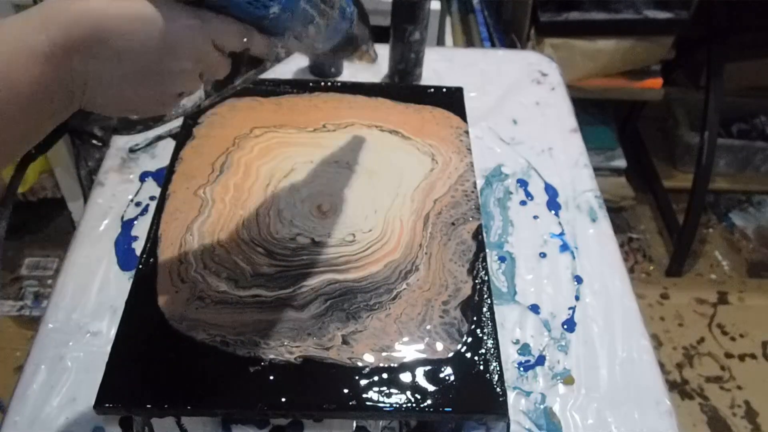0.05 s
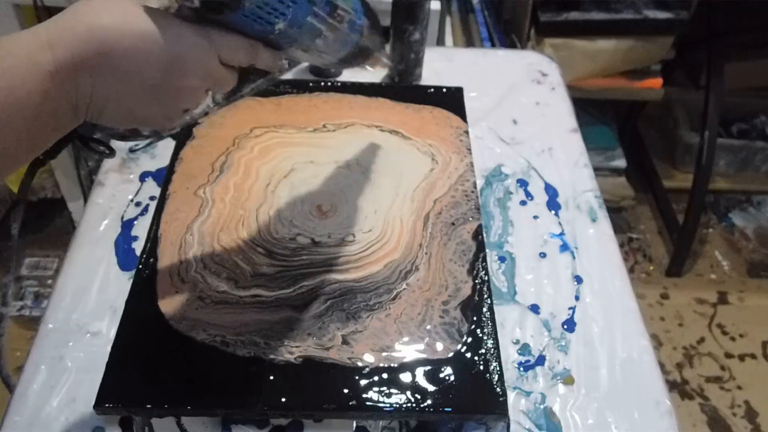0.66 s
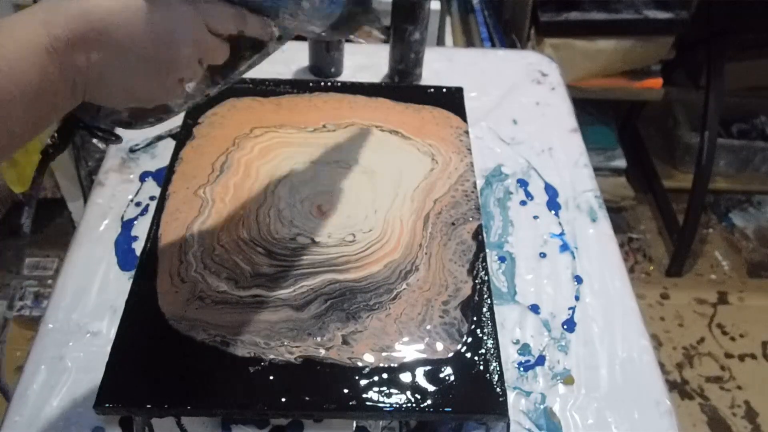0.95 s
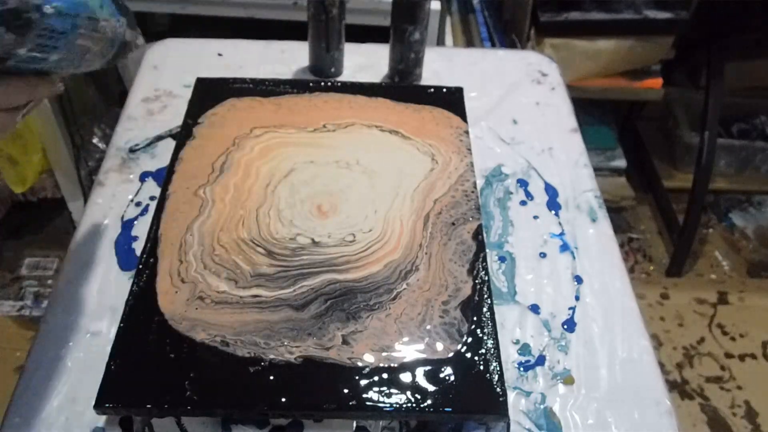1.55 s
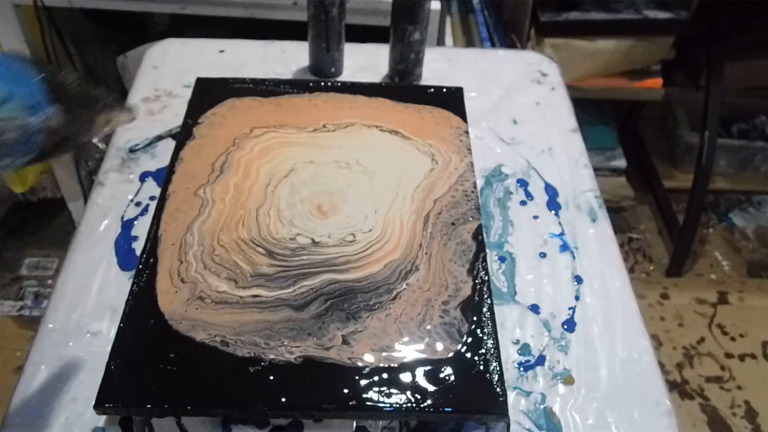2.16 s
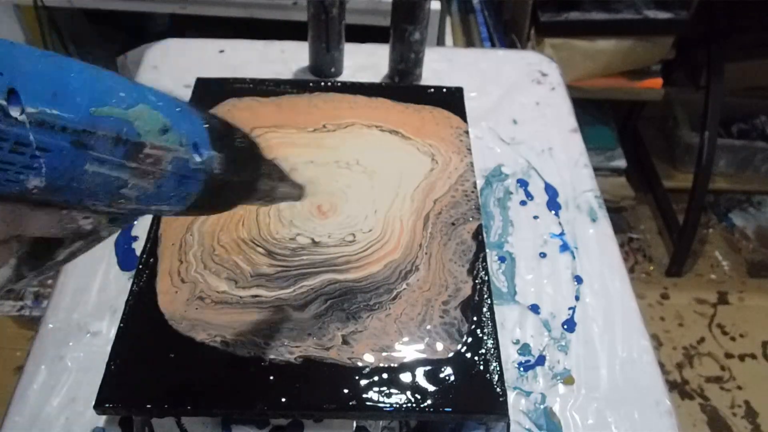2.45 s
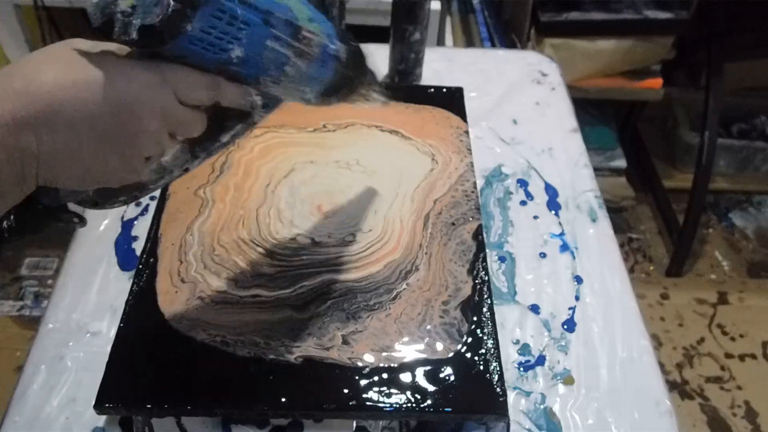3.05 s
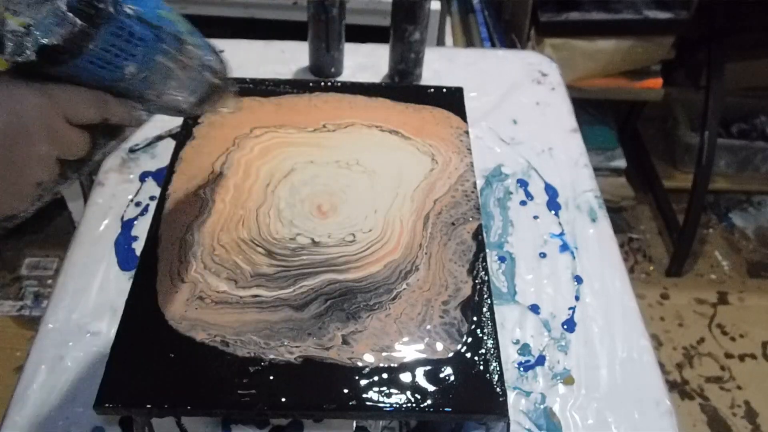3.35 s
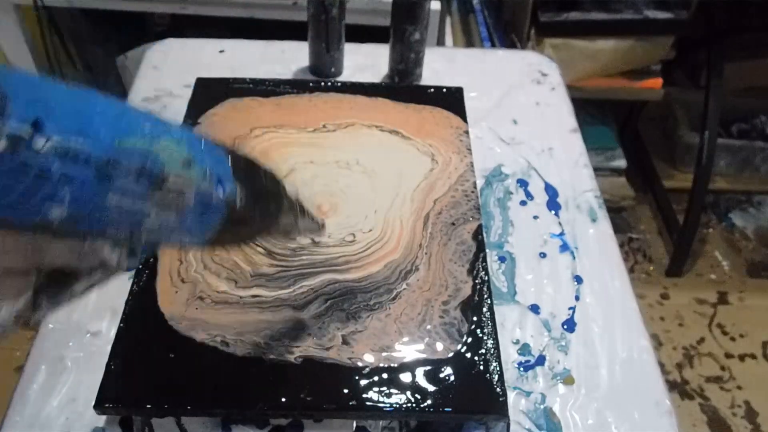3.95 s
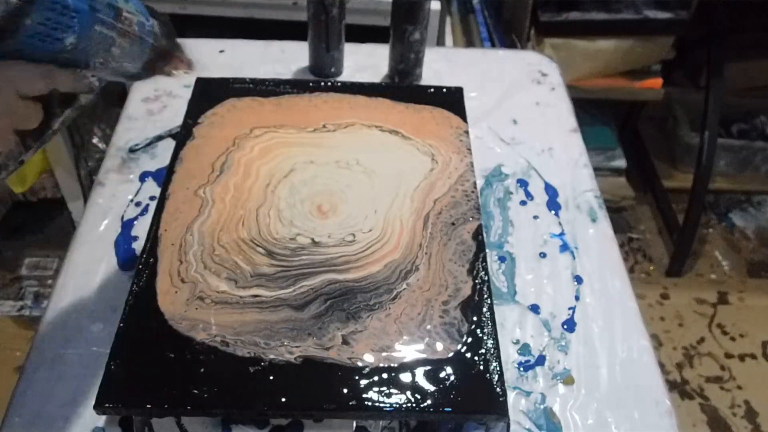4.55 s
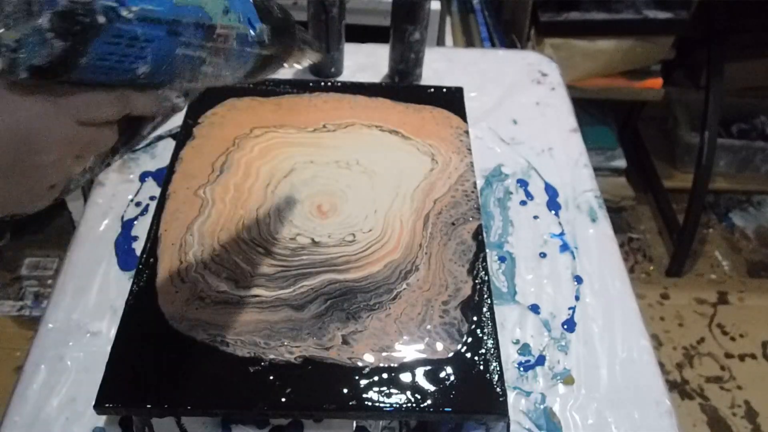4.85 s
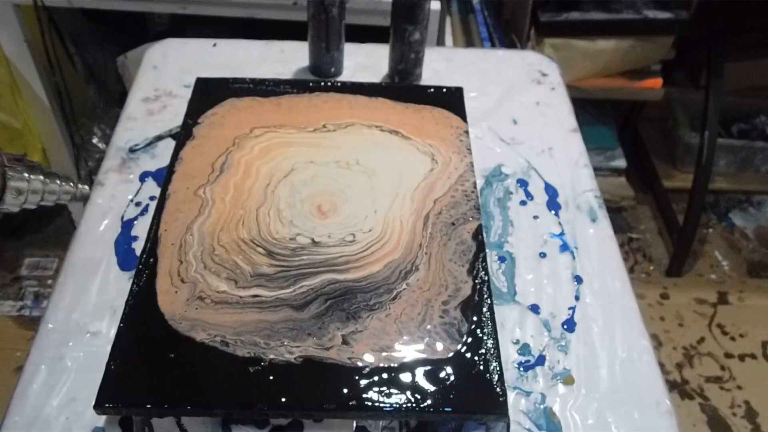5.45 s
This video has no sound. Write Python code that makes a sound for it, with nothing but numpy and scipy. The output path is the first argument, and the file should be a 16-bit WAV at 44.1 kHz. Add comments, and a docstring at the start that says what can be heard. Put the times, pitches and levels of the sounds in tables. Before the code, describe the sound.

Steady rush of air and a high motor whine from a heat gun moving to and fro over a wet painting indoors.

```python
"""A handheld electric heat gun runs steadily, swept to and fro over a wet painting in a small workroom.
Churning air from its fan roars through the hollows of the housing and barrel, and the little motor
whines at multiples of its turning rate. As the gun swings left it sounds farther away and changes
colour. Twice the jet hisses close over the canvas. Behind it all, the room hums faintly."""
import sys
import numpy as np
from scipy import signal
from scipy.fft import rfft, irfft
from scipy.io import wavfile
from scipy.ndimage import map_coordinates

SR = 44100
rng = np.random.default_rng(int(sys.argv[2]) if len(sys.argv) > 2 else 0)


def master_out(mix):
    """Clip the mix to full scale and print it as 16-bit PCM to the path in sys.argv[1]."""
    frames = np.transpose(np.atleast_2d(mix))
    ceiling = np.clip(frames, -1, 1)
    pcm = np.round(ceiling * 32767).astype(np.int16)
    wavfile.write(sys.argv[1], SR, pcm)


N = 247842
TIME, FREQS = np.arange(N) / SR, np.maximum(np.arange(N // 2 + 1) * SR / N, 1)
SIDES = np.array([[1], [-1]])   # left, right

# Where the gun is. Each row: time in seconds, bearing (0 is straight ahead, 1 is fully left).
GUN_BEARING = [(0, 0), (1.05, .06), (1.35, .24), (1.65, .54), (1.85, .82), (2.08, .88), (2.4, .6),
               (2.55, .54), (3.05, .1), (3.35, .39), (3.6, .2), (3.9, .47), (4.25, .81), (4.85, .28),
               (5.15, .68), (5.4, .94), (5.62, .94)]
# The tone colour of the churning air. Each row: frequency in Hz, relative level in dB.
AIR_SPECTRUM = [(25, -39.5), (50, -41), (150, -38.5), (220, -32), (290, -27), (470, -21), (590, -12.5),
                (1000, -1), (1800, -0.5), (2850, -7.5), (3120, -14.5), (4000, -15), (4600, -17.5),
                (8500, -19), (15500, -31)]
# Resonances and hollows of housing and barrel. Each row: centre in Hz, width in Hz, boost or cut in dB.
HOUSING_RESONANCES = [(432, 117, 4), (526, 38, 4.5), (614.6, 102, 9.5), (741, 73, 5.5), (957, 124, 2.5),
                      (1210, 140, 1), (1270, 100, 2), (1405, 41, -13), (1420, 75, 3.5), (1850, 133, 4),
                      (2160, 180, -1), (2400, 190, 1.5), (2618, 250, 3), (2924, 164, 4.5), (3410, 330, 5),
                      (3967, 350, 6.5), (5530, 370, -3), (6650, 2500, 1), (11100, 560, -2.5)]
# How each band of the roar is beamed. Each row: lower edge in Hz, change from ahead to fully left
# in dB, extra when straight ahead in dB.
AIR_BEAMS = [(0, -1.5, -3), (510, 2.5, 3.5), (780, 8, 4.5), (1140, -2.5, -2.5), (1660, 0, 2.5),
             (2030, -2, -3), (3000, -8.5, -4), (4200, -0.5, 0.5), (7540, 8.5, 4), (10800, 1, 1)]
# The upper-middle rush, dullest as the gun is drawn back. Each row: time in seconds, relative dB.
RUSH_LEVEL = [(0, 1.5), (.5, 2), (1.15, 3), (1.45, -1.5), (1.92, -4.5), (2.35, -0.5), (3.0, 1), (3.8, -0.5),
              (4.45, -3), (4.85, 1.5), (5.2, -1), (5.62, -1.5)]
# The treble, strongest while the jet plays on the canvas. Each row: time in seconds, relative dB.
TREBLE_LEVEL = [(0, 1), (1.3, 2.5), (1.6, 1.3), (2.1, 1.8), (2.4, 4), (3.0, 2.5), (4.0, 3.3), (4.95, 2.5),
                (5.62, 2)]
# The band that the bounce off the table cancels as the gun is raised and lowered.
# Each row: time in seconds, centre in Hz, depth from 0 to 1.
TABLE_NOTCH = [(0, 846, 0.6), (1.25, 890, 0.44), (1.75, 710, 0.63), (2.25, 690, 0.47), (2.5, 680, 0.24),
               (2.95, 750, 0.28), (3.5, 750, 0.36), (4.05, 686, 0.05), (4.42, 720, 0.57), (5.1, 610, 0.17),
               (5.62, 517, 0.7)]
# Brief swells and dips in the roar. Each row: peak time in seconds, spread in seconds, centre in Hz,
# width in Hz, boost or cut in dB.
PASSING_COLOURS = [(.45, 0.12, 730, 120, 2.5), (.48, 0.079, 2280, 250, 5), (2.04, 0.072, 2000, 150, -9),
                   (2.38, 0.13, 1460, 100, 5.5), (4.15, 0.091, 1990, 350, -5.5),
                   (4.45, 0.15, 2480, 300, -4), (5.33, 0.063, 1850, 200, -10), (5.435, 0.1, 960, 260, 2),
                   (5.47, .2, 1240, 160, -9)]
# Motor speed, creeping up and swaying with the sweeps. Each row: time in seconds, turns per second.
MOTOR_SPEED = [(0, 324.3), (.45, 324.35), (.9, 324.9), (1.5, 325.25), (1.8, 325.7), (2.15, 325.45),
               (2.35, 325.95), (2.65, 325.45), (3.1, 325.9), (3.4, 326.9), (3.55, 327.05), (3.77, 326.65),
               (4.05, 327.4), (4.55, 326.9), (4.85, 327.8), (5.25, 327), (5.62, 327.25)]
# The five-blade fan's tone, the whine of the commutator (the motor's turning contact) and its octave.
# Each row: time in seconds, level in dB, left minus right in dB.
FAN_TONE = [(0, -30.5, -4), (.9, -31.5, 1.5), (1.19, -37.5, -3), (1.33, -30.5, -1), (1.53, -37, 0),
            (1.6, -32, 4), (1.82, -34, 1), (1.9, -38, 0), (2.15, -39, 2), (2.4, -32, 0), (2.8, -31.5, 1),
            (2.88, -37, 3), (3.11, -31, 1), (3.38, -40, 1), (3.58, -34, 0), (3.87, -36, -2),
            (4.06, -33.5, 12), (4.16, -29, 9), (4.33, -36, 2), (4.62, -34.5, 0), (4.85, -32.5, 0),
            (5.27, -34, 2), (5.42, -27.5, 3), (5.62, -28, 3)]
COMMUTATOR_WHINE = [(0, -33, 2), (.35, -35.5, 5), (.68, -34, 0), (.86, -33.5, 1), (.92, -36, -2),
                    (1, -34.5, 0), (1.13, -36, 4), (1.38, -35, 3), (1.48, -29.5, 3), (1.56, -37, 1),
                    (1.66, -32, 0), (1.79, -44, 0), (1.89, -36, 10), (2.15, -35.5, 12), (2.22, -45, 2),
                    (2.36, -37.5, 7), (2.44, -40, 5), (2.53, -32.5, 10), (2.7, -41, 9), (2.77, -37, 13),
                    (2.85, -43, 1), (2.95, -36.5, 5), (3.15, -38, 3), (3.28, -35, 0), (3.42, -38.5, 4),
                    (3.72, -32.5, 9), (3.85, -39.5, 7), (3.99, -32, 7), (4.08, -45, 0), (4.25, -35, 7),
                    (4.5, -38.5, 1), (4.63, -39, 1), (4.72, -33, 1), (4.82, -49, 2), (4.92, -33.5, 9),
                    (5.04, -41, -2), (5.11, -39, 7), (5.26, -47, 5), (5.35, -34.5, 10), (5.5, -43, 0),
                    (5.62, -53, 0)]
WHINE_OCTAVE = [(0, -40.5, -1), (.32, -40.5, 0), (.4, -46, -4), (.6, -47, -4), (.78, -47, -1),
                (.97, -38.5, 3), (1.05, -46, 1), (1.11, -41.5, 0), (1.28, -46, 1), (1.37, -41, -7),
                (1.48, -46, 0), (1.6, -41, 0), (1.67, -48, -1), (1.76, -41.5, 8), (1.9, -46, 0),
                (2.3, -44, 4), (2.45, -48, 0), (2.8, -44, -2), (2.97, -40, 2), (3.04, -47, 0),
                (3.09, -41, -5), (3.19, -47, 0), (3.33, -41, 6), (3.52, -45, -3), (3.65, -41, 4),
                (3.85, -48, 0), (4.1, -44, -6), (4.3, -45.5, 0), (4.47, -43, 0), (4.55, -48, -1),
                (4.72, -41.5, 0), (4.86, -41, 0), (4.94, -49, 0), (5.02, -42, 4), (5.13, -50, 0),
                (5.3, -42.5, 0), (5.45, -50, 0), (5.62, -47, 0)]
# Two tones just under the whine. Each row: time in seconds, dB of the 10th multiple, dB of the 11th.
SIDE_TONE_LEVELS = [(0, -47, -55), (.42, -43.5, -44), (.9, -47.5, -38.5), (1.2, -56, -46), (1.55, -54, -44),
                    (1.75, -52, -47), (1.88, -38, -48), (2.05, -44, -53), (2.25, -47, -50),
                    (2.43, -40.5, -49), (2.6, -48, -49), (3.25, -46, -44), (3.8, -46.5, -44.5),
                    (4.4, -47, -48), (4.75, -47, -45), (5.15, -47, -49), (5.3, -41, -50), (5.62, -55, -54)]
# The weaker motor tones. Each row: multiple of the turning rate, relative level in dB.
WEAK_TONES = [(7, -44.5), (9, -51.5), (13, -51), (14, -54), (15, -50), (16, -58), (17, -54), (18, -54.5),
              (19, -53.5), (20, -56.5), (21, -50.5), (22, -50.5), (23, -50)]
# The buzz of the motor's brushes. Each row: frequency in Hz, relative level of one tone in dB.
BUZZ_SPECTRUM = [(8150, -54), (8800, -55), (9450, -54.5), (10100, -50), (10450, -55), (12050, -56),
                 (12380, -51.5), (12700, -56.5), (13100, -52.5), (13400, -56), (13700, -54), (14600, -56.5),
                 (15700, -64)]
# The buzz is weakest with the vents turned away. Each row: time in seconds, level change in dB.
BUZZ_LEVEL = [(0, 0), (.6, 0), (1.3, 0), (1.85, -2), (2.45, -1), (3, .5), (3.9, 0), (4.35, -0.5),
              (4.9, 1.5), (5.25, -0.5), (5.62, -5)]
# Hisses on the canvas; the first two sound as one. Each row: peak time in seconds, spread in seconds,
# centre in Hz, width in Hz, level in dB.
CANVAS_HISSES = [(3.565, .04, 4950, 1300, -37.5), (3.565, .035, 7600, 3800, -37),
                 (4.97, .045, 11500, 5000, -46)]
# The microphone's two openings (ports) hear unequally. Each row: frequency in Hz, left minus right in dB.
PORT_BALANCE = [(110, -0.5), (330, 2.7), (600, 0.5), (1300, 1.5), (1800, 0), (2300, -1.5), (3200, -0.5),
                (4000, 0.5), (6000, 0)]
# The room's hum; its top tone beats against the shaft hum. Each row: frequency in Hz, level in dB.
ROOM_TONES = [(46.9, -83), (93.8, -84), (140.7, -84), (187.6, -81), (329.5, -63.5)]


def fan_roar(bearing, level_db, flutter_db, treble_flutter_db, wander_db):
    """Churning air rings in the housing; each band is beamed its own way as the gun turns."""
    resonance_db = sum(db * bell(hz, width) for hz, width, db in HOUSING_RESONANCES)
    spectrum = noise_spectra() * from_db(at_hz(AIR_SPECTRUM, FREQS) + resonance_db)
    spectrum = spectrum / np.std(irfft(spectrum, N))
    above_edge = [1] + [1 - below(hz) for hz, _, _ in AIR_BEAMS[1:]] + [0]
    roar = 0
    for low, high, (_, left_db, ahead_db) in zip(above_edge, above_edge[1:], AIR_BEAMS):
        db = left_db * bearing + ahead_db * facing(bearing) + wander_db * drift(7)
        roar = roar + irfft(spectrum * (low - high), N) * from_db(db - db.mean())
    roar = swell_band(roar, in_time(RUSH_LEVEL)[0], low_hz=2210, high_hz=3070)
    treble_db = in_time(TREBLE_LEVEL)[0] + treble_flutter_db * drift(40)
    roar = swell_band(roar, treble_db, low_hz=4400, high_hz=SR)
    return from_db(level_db + flutter_db * drift(25.51)) * roar


def table_bounce(roar, width_hz):
    """The bounce off the table cancels one band, which slides as the gun moves."""
    radius = np.exp(-np.pi * width_hz / SR)
    zeros = np.array([1, 0, -1]) * (1 - radius ** 2) / 2
    state, band = np.zeros((len(roar), 2)), np.zeros_like(roar)
    hz, depth = in_time(TABLE_NOTCH)
    for block in np.array_split(np.arange(N), 400):
        poles = [1, -2 * radius * np.cos(2 * np.pi * hz[block[0]] / SR), radius ** 2]
        band[:, block], state = signal.lfilter(zeros, poles, roar[:, block], zi=state)
    return roar - band * depth


def passing_colours(roar):
    """The roar swells or dips at one pitch as the gun passes certain spots."""
    spectrum = rfft(roar)
    for peak_s, spread_s, hz, width, db in PASSING_COLOURS:
        band = irfft(spectrum * bell(hz, width), N)
        roar = roar + band * (from_db(db * pulse(peak_s, spread_s)) - 1)
    return roar


def clutter_echoes(roar, bearing, echo_db, max_slide_s):
    """Eight short echoes off the clutter colour the roar; their delays slide as the gun swings."""
    out = roar
    for delay_s, slide in rng.uniform([.003, -1], [.014, 1], (8, 2)):
        earlier = (TIME - delay_s - slide * max_slide_s * bearing) % TIME[-1]
        out = out + from_db(echo_db) * np.array([np.interp(earlier, TIME, path) for path in roar])
    return out


def motor_tone(turns, travel, multiple, echo_db, flutter_db):
    """One tone: direct, room left, room right. Hand travel varies the echoes, faster for high tones."""
    position = [travel[::128] * np.sqrt(multiple)]
    common, difference = [
        map_coordinates(real, position, mode="wrap") + 1j * map_coordinates(imag, position, mode="wrap")
        for real, imag in rng.standard_normal((2, 2, 512))]
    echoes = from_db(echo_db) * unit_level(room_pair(common, difference, multiple * MOTOR_SPEED[0][1]))
    flutter = unit_level(from_db(flutter_db * drift(22)))
    wave = np.sqrt(2) * flutter * np.exp(2j * np.pi * (multiple * turns + rng.random()))
    return np.array([wave] + [np.interp(TIME, TIME[::128], echo) * wave for echo in echoes]).real


def whines(turns, travel, bearing):
    """Fan tone, commutator whine and its octave leave the vents in beams that sweep over the ports."""
    out = 0
    for multiple, levels, echo_db, flutter_db in [
            (5, FAN_TONE, -20, .9), (12, COMMUTATOR_WHINE, -18, .6), (24, WHINE_OCTAVE, -5, 2.6)]:
        db, balance_db = in_time(levels)
        paths = motor_tone(turns, travel, multiple, echo_db, flutter_db) / np.hypot(1, from_db(echo_db))
        pan = from_db(SIDES * balance_db / 2)
        pan = pan / np.sqrt(np.mean(pan ** 2, axis=0))
        out = out + from_db(db) * pan * (left_first(paths[0], bearing) + paths[1:])
    return out


def motor_hum(turns, travel, bearing):
    """The shaft's hum, which spreads sideways and so fades straight ahead, plus the two side tones."""
    shaft_db = -47.7 - 14 * facing(bearing) ** 3
    hum = from_db(shaft_db) * motor_tone(turns, travel, 1, echo_db=-24, flutter_db=.5)
    for multiple, db in zip((10, 11), in_time(SIDE_TONE_LEVELS)):
        hum += from_db(db) * motor_tone(turns, travel, multiple, echo_db=-7, flutter_db=1.8)
    return hum


def brush_buzz(turns, travel):
    """The brushes buzz at high multiples of the turning rate, above the weaker motor tones."""
    tones = [(multiple, db + .3) for multiple, db in WEAK_TONES]
    tones += [(multiple, at_hz(BUZZ_SPECTRUM, multiple * MOTOR_SPEED[0][1]) + .5)
              for multiple in range(25, 49)]
    buzz = sum(from_db(db) * motor_tone(turns, travel, multiple, echo_db=1, flutter_db=2.1)
               for multiple, db in tones)
    return from_db(in_time(BUZZ_LEVEL)[0]) * buzz


def canvas_hiss():
    """The jet hisses where it passes close over the canvas."""
    out = 0
    for peak_s, spread_s, hz, width, db in CANVAS_HISSES:
        hiss = unit_level(irfft(noise_spectra() * bell(hz, width), N))
        out = out + hiss * from_db(db) * pulse(peak_s, spread_s)
    return out


def room_hum():
    """Faint, steady low tones, the same on both sides."""
    return sum(np.sqrt(2) * from_db(db) * np.sin(2 * np.pi * (hz * TIME + rng.random()))
               for hz, db in ROOM_TONES)


def at_ports(paths, bearing, near_share, far_share, shade_db, shade_hz):
    """As the gun swings left, the room's sound takes over and the right port falls into shade."""
    direct_share = far_share + (near_share - far_share) * facing(bearing)
    pair = np.sqrt(direct_share) * left_first(paths[0], bearing) + np.sqrt(1 - direct_share) * paths[1:]
    bass = irfft(rfft(pair) / (1 + (FREQS / shade_hz) ** 2), N)   # long waves bend round to both ports
    pair = bass + (pair - bass) * from_db(SIDES * shade_db * bearing / 2)
    return irfft(rfft(pair) * from_db(SIDES * at_hz(PORT_BALANCE, FREQS) / 2), N)


def left_first(direct, bearing, max_lag_s=9e-5):
    """Sound from the left reaches the left port first."""
    shifts = SIDES * bearing * max_lag_s * SR / 2
    return np.array([map_coordinates(direct, [np.arange(N) + shift], order=5, mode="nearest")
                     for shift in shifts])


def facing(bearing):
    """1 while the gun faces the microphone, falling towards 0 as it swings out."""
    return np.exp(-bearing / .28)


def room_pair(common, difference, hz):
    """Room sound at two close ports: alike for long waves, unrelated for short ones."""
    alike = .94 / (1 + (hz / 3000) ** 3)
    return np.sqrt(1 + alike) * common + np.sqrt(1 - alike) * difference * SIDES


def noise_spectra():
    """Spectra of white noise on three paths: direct, room left, room right."""
    direct, common, difference = rfft(rng.standard_normal((3, N)))
    return np.vstack([direct, room_pair(common, difference, FREQS) / np.sqrt(2)])


def swell_band(sound, curve_db, low_hz, high_hz):
    """Turn one band up and down as a curve moves around its average."""
    band = irfft(rfft(sound) * (below(high_hz) - below(low_hz)), N)
    return sound + band * (from_db(curve_db - curve_db.mean()) - 1)


def below(hz):
    """A steep filter shape that keeps what lies below `hz`."""
    return 1 / (1 + (FREQS / hz) ** 20)


def bell(hz, width_hz):
    """A hump of height 1 over frequency."""
    return 2 ** -(2 * (FREQS - hz) / width_hz) ** 2


def pulse(peak_s, spread_s):
    """A hump of height 1 over time."""
    return np.exp(-.5 * ((TIME - peak_s) / spread_s) ** 2)


def drift(rate):
    """A smooth random wobble of typical size 1, with about `rate` new values a second."""
    coarse = map_coordinates(rng.standard_normal(4096), [TIME[::32] * rate], order=3, mode="wrap")
    return unit_level(np.interp(TIME, TIME[::32], coarse))


def in_time(rows):
    """Join a table's timed rows into one curve for each value column."""
    seconds, *columns = np.transpose(rows)
    return [np.interp(TIME, seconds, column) for column in columns]


def at_hz(rows, hz):
    """Read between a table's rows, with octaves evenly spaced."""
    row_hz, values = np.transpose(rows)
    return np.interp(np.log(hz), np.log(row_hz), values)


def from_db(db):
    """Turn decibels into a gain."""
    return 10 ** (np.asarray(db) / 20)


def unit_level(x):
    """Scale to an average power of 1."""
    return x / np.sqrt(np.mean(np.abs(x) ** 2) + 1e-20)


def scene():
    """The gun's air and motor, carried to and fro by the hand, over the hum of the room."""
    bearing = in_time(GUN_BEARING)[0]
    roar = fan_roar(bearing, level_db=-24.5, flutter_db=.17, treble_flutter_db=.55, wander_db=.4)
    roar = passing_colours(table_bounce(roar, width_hz=220))
    roar = clutter_echoes(roar, bearing, echo_db=-25, max_slide_s=.0012)
    turns = np.cumsum(in_time(MOTOR_SPEED)[0] + .3 * drift(70)) / SR   # the motor is slightly unsteady
    travel = 1.8 * TIME + 2.5 * np.cumsum(np.abs(np.gradient(bearing)))   # hand tremor plus sweeps
    motor = motor_hum(turns, travel, bearing) + brush_buzz(turns, travel)
    paths = roar + motor + canvas_hiss()
    gun = at_ports(paths, bearing, near_share=.66, far_share=.4, shade_db=4.5, shade_hz=1500)
    return gun + whines(turns, travel, bearing) + room_hum()


def record(dry):
    """Cut the treble steeply above 15750 Hz."""
    return signal.sosfilt(signal.ellip(12, .1, 80, 15750, fs=SR, output="sos"), dry)


dry = scene()
out = record(dry)
master_out(out)
```